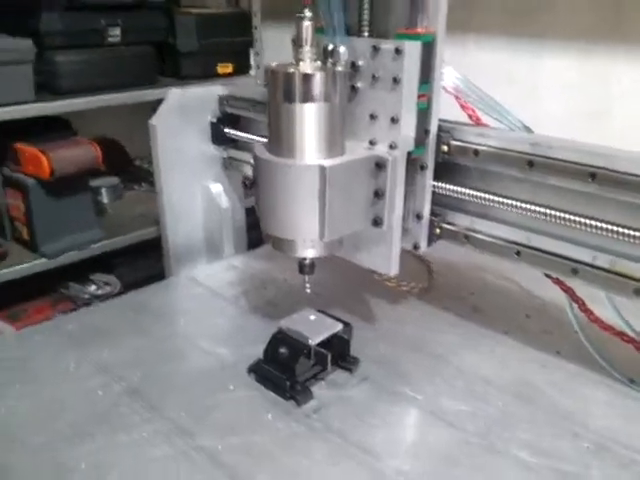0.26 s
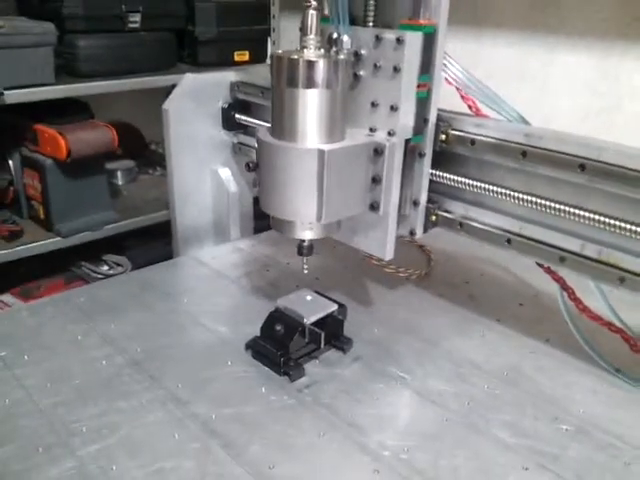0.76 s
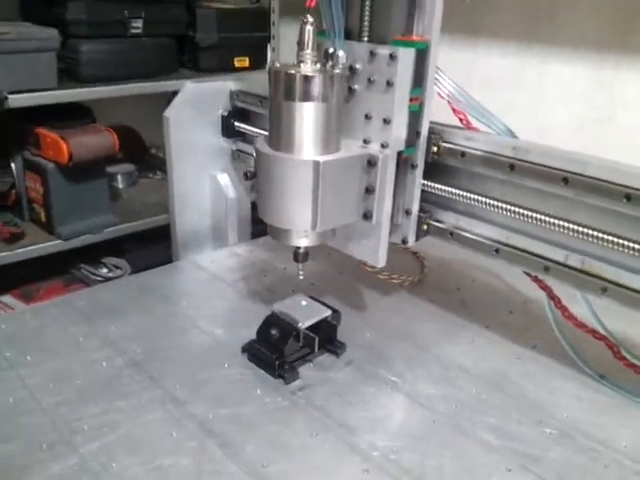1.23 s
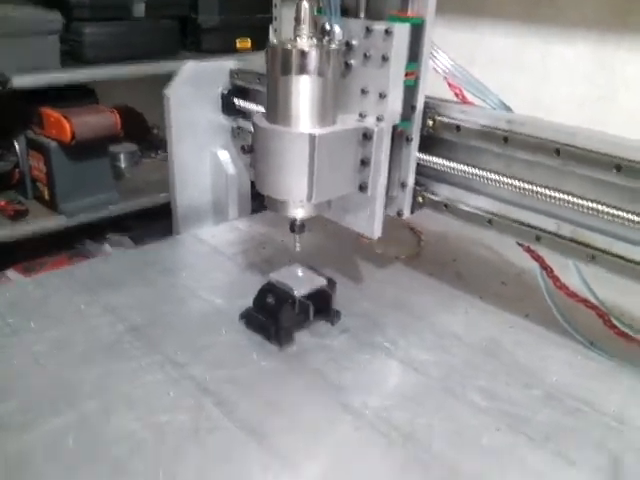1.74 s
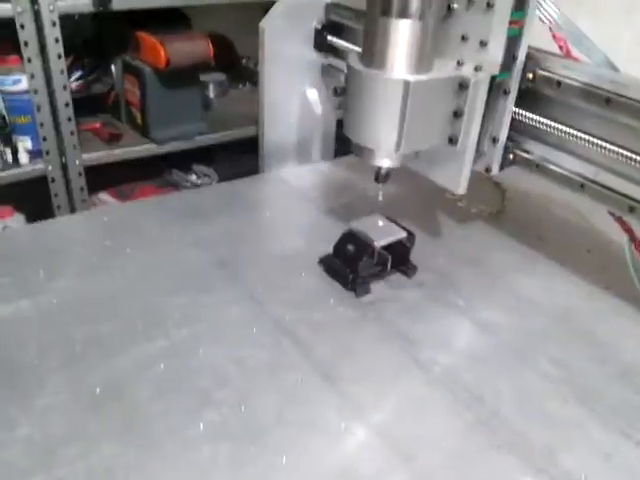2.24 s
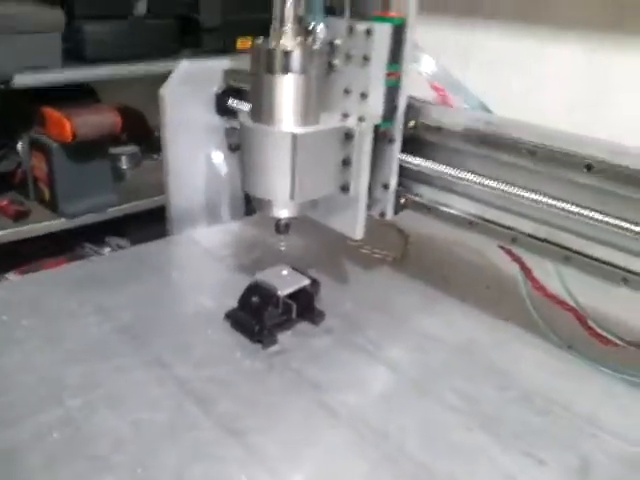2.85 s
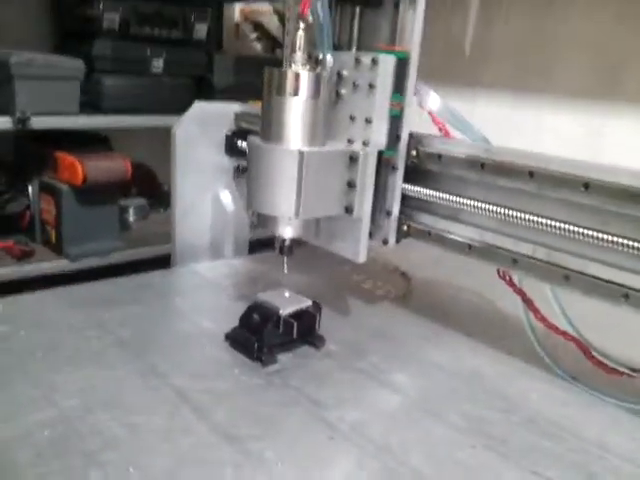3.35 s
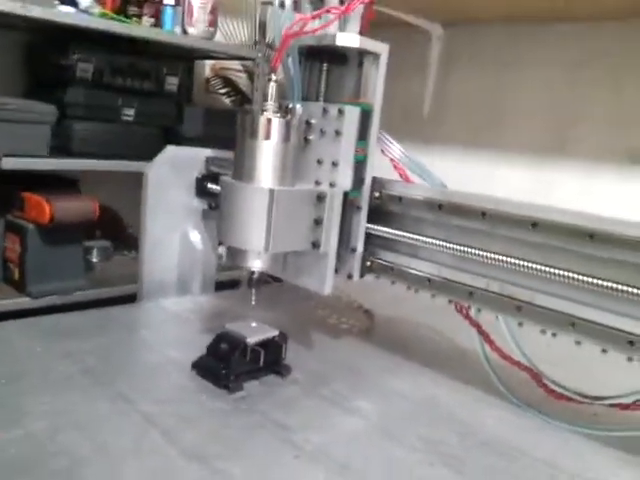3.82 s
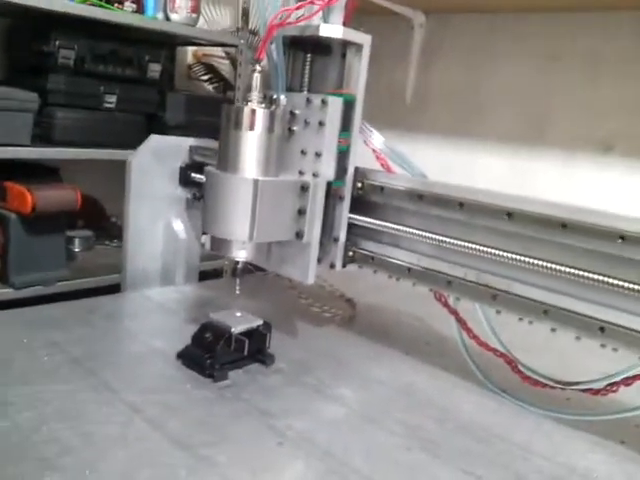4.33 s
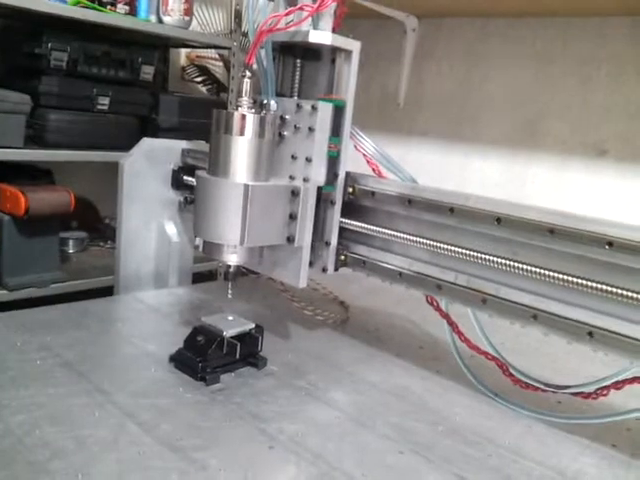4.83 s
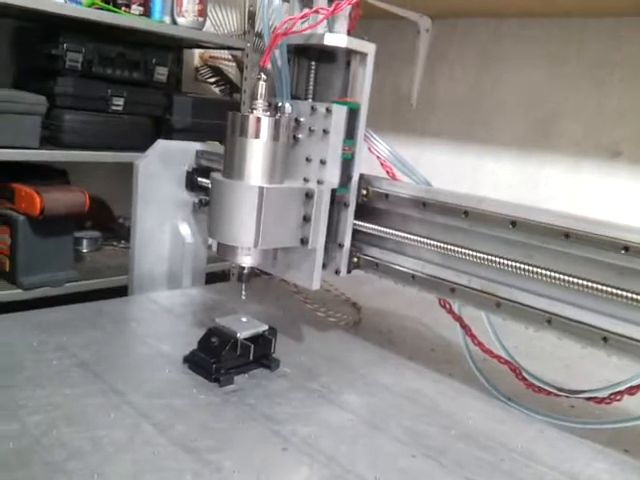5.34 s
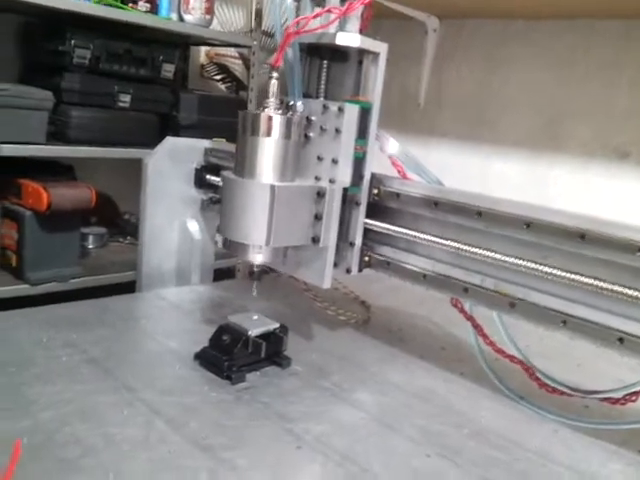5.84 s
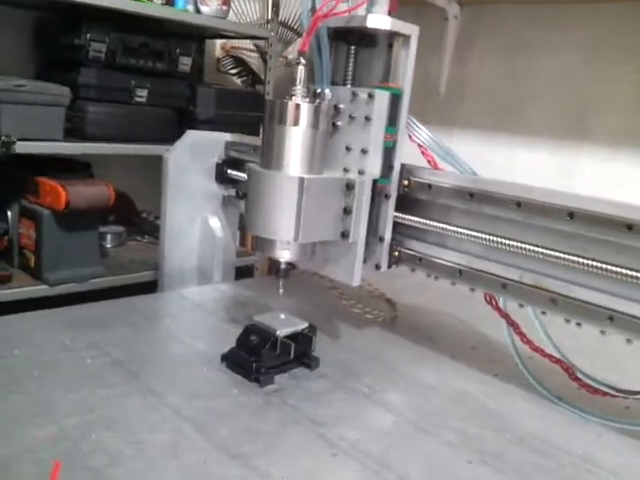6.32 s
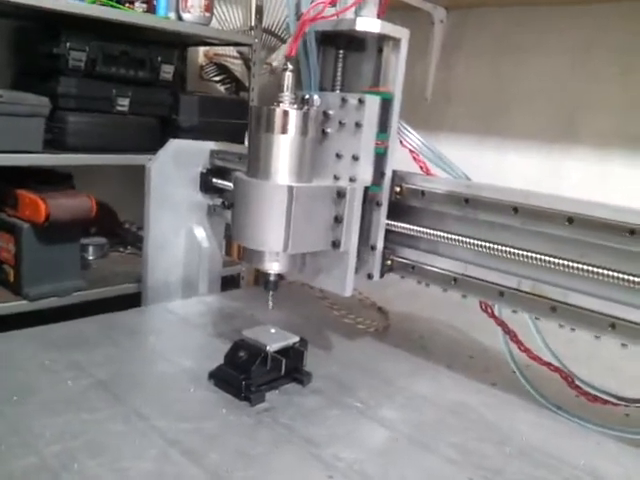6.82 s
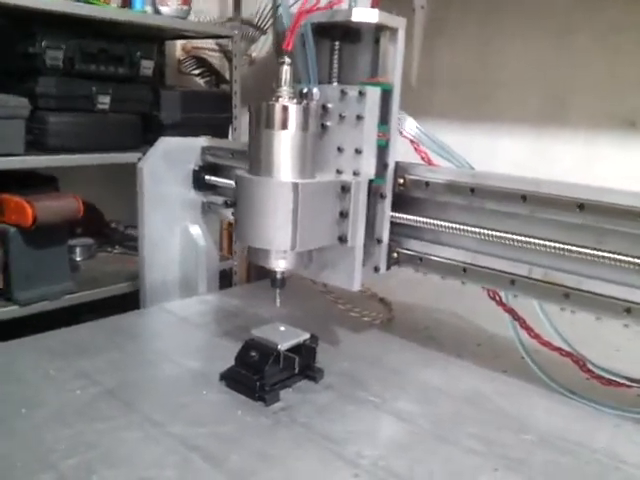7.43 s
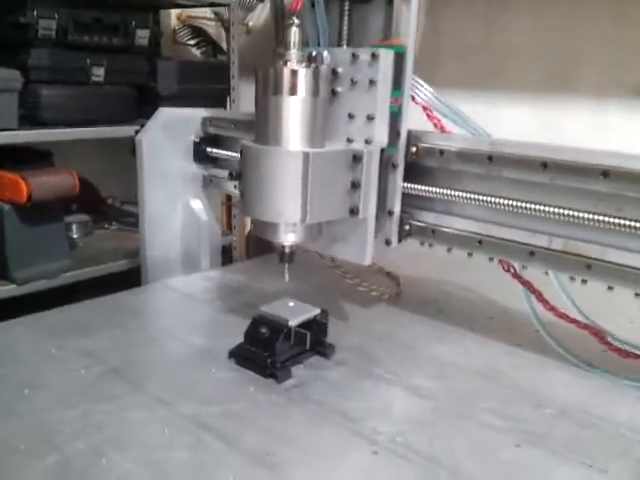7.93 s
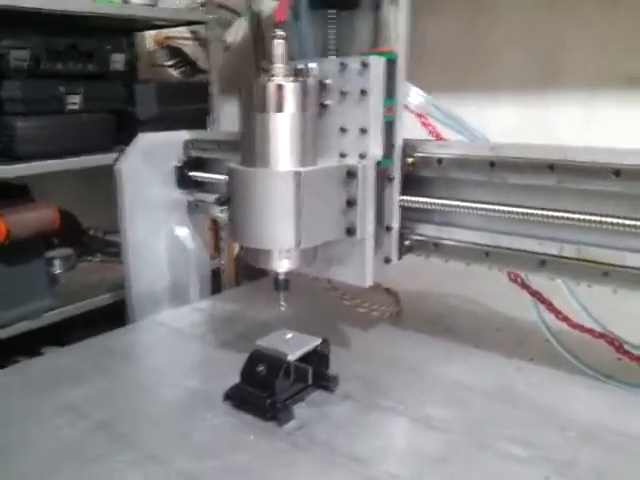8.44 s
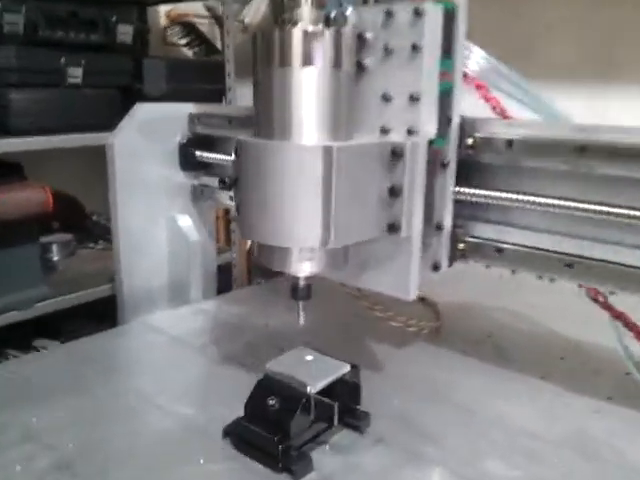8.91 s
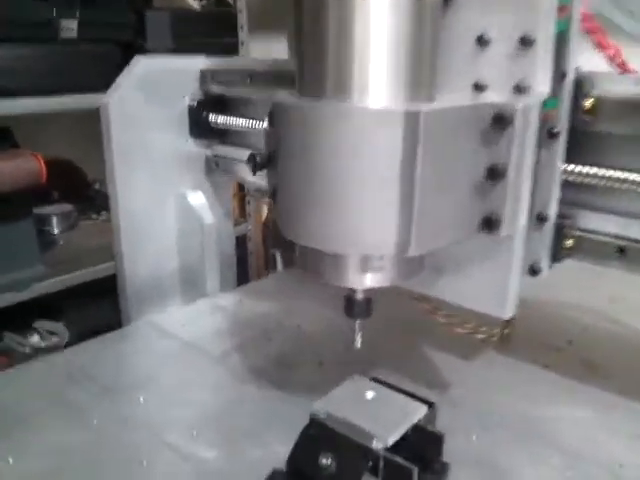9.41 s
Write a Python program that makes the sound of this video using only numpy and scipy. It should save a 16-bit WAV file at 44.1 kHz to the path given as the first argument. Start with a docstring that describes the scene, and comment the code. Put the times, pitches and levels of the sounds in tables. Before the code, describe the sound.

A pump hums and buzzes steadily in a workshop, with machine noise and a soft air hiss. A little past halfway, a CNC router spindle switches on with a crackle and a brief high whistle, which gives way to a loud, piercing electrical whine. The whine flutters ever faster as the spindle speeds up, and the bearings begin to sing. A hand-held mono microphone moves in close near the end.

```python
"""CNC router spinning up in a workshop.

A pump hums and air hisses throughout, heard through a hand-held mono microphone that moves in on the
spindle. The inverter switches on with a crackle and the windings whine at its switching rate. As the
spindle runs up, the sidebands spread and beat ever faster, and the bearings begin to sing."""
import sys
import numpy as np
from scipy import signal
from scipy.fft import rfft, irfft, next_fast_len
from scipy.io import wavfile
from scipy.ndimage import uniform_filter1d, map_coordinates

SR = 44100
rng = np.random.default_rng(int(sys.argv[2]) if len(sys.argv) > 2 else 0)


def file_out(sig):
    """Save sig as 16-bit WAV at sys.argv[1]."""
    # one column per channel
    cols = np.atleast_2d(sig).T
    # limit, then scale
    lim = np.clip(cols, -1, 1)
    pcm = np.round(lim * 32767).astype(np.int16)
    wavfile.write(sys.argv[1], SR, pcm)


N = 426447
T = np.arange(N) / SR
PUMP_HZ, CARRIER_HZ = 34.665, 3998.19
POWER_ON_S, RATE_DROP_S = 5.55, 5.92  # inverter starts; its switching rate drops
FACE_S, AWAY_S = 2.036, 8.225  # microphone swings towards the machine, then away

# Machine noise spectrum. Each row: frequency in Hz, relative density in dB.
MACHINE_SPECTRUM = [(20, -36), (55, -28), (90, -7.5), (135, 0.5), (210, 3), (280, 4), (400, 6.5),
                    (490, 4.5), (700, 4), (1000, 0), (1500, -1.5), (1950, -1.5), (2300, -6.5), (3600, -9.5),
                    (5200, -15), (9000, -15.5)]
# Air hiss spectrum. Each row: frequency in Hz, relative density in dB.
HISS_SPECTRUM = [(900, -22), (2400, -6), (3400, -7), (4500, -6), (5800, -4.5), (6700, -0.5), (8000, 0),
                 (9000, -7.5), (10200, -20), (12000, -22)]
# Sizzle spectrum. Each row: frequency in Hz, relative density in dB.
SIZZLE_SPECTRUM = [(7000, -40), (9500, -7.5), (10600, -6.5), (11400, 3.5), (12000, -8)]
# Sizzle envelope. Each row: time in seconds, level in dB before trim.
SIZZLE_ENVELOPE = [(.3, -41), (1.95, -42), (2.2, -38), (2.65, -40.5), (2.88, -37.5), (3.2, -40), (5.2, -46),
                   (6.8, -45), (7.45, -39.5), (8.15, -45), (8.4, -39), (8.8, -44.5)]
# Microphone path. Each row: time in seconds, closeness to the spindle from 0 to 1.
MIC_CLOSENESS = [(0, 0.17), (3, 0.08), (4.3, 0.03), (6.3, 0.11), (7.6, 0.36), (8.3, 0.36), (9.1, 1)]
# Pump envelopes. Each row: time in seconds, then low hum, upper hum and casing tone in dB before trim.
PUMP_ENVELOPES = [(0.3, -31.5, -36.5, -43), (1.76, -30, -32.5, -44), (2.59, -30, -35, -43.5),
                  (3.51, -30.5, -32.5, -50), (5.07, -30.5, -31.5, -45), (6.67, -31, -31.5, -49),
                  (9.67, -33.5, -35, -48)]
# Pump hum across the table. Each row: harmonic number, relative level in dB.
HARMONICS_FAR = [(1, -36), (2, -34.5), (3, -29.5), (4, -16), (5, -11.5), (6, -49), (7, -3), (8, -14.5),
                 (9, 3), (10, -27), (11, -6.5), (12, -13), (13, -24), (14, -19.5), (15, -22), (16, -9.5),
                 (17, -6), (18, -1), (19, -32), (20, -8.5), (21, -11), (22, -18.5), (23, -16.5), (24, -13),
                 (25, -18.5), (26, -25), (27, -22), (28, -24), (29, -18.5), (30, -27)]
# Pump hum by the spindle. Each row: harmonic number, relative level in dB.
HARMONICS_NEAR = [(1, -31), (2, -26), (3, -17.5), (4, -12.5), (5, -7), (6, -15), (7, -10), (8, -6.5),
                  (9, -11), (10, -7), (11, 1.5), (12, -10), (13, -16), (14, -20), (15, -21), (16, -6.5),
                  (17, -9), (18, -8), (19, -7), (20, -11.5), (21, -3), (22, -10), (23, -5), (24, -11),
                  (25, -26), (26, -18), (27, -29), (28, -21), (29, -16), (30, -17)]
# Pump casing resonances. Each row: frequency in Hz, width in Hz, gain in dB.
CASING_MODES = [(1151, 72, 3.5), (1360, 115, -4.5), (1833, 270, -3.5), (1979, 59, 3), (3018, 200, -4),
                (3320, 360, -2.5), (4400, 290, -4)]
# Ticks and crackles. Each row: peak time in seconds, level in dB, centre in Hz, width in octaves,
# 40 dB decay time in seconds.
TICK_BURSTS = [(2.049, -26, 1190, 0.39, 0.028), (3.308, -32, 5000, .3, .12), (5.558, -25, 7800, 0.24, 0.14),
               (5.928, -32, 5400, 0.035, .25), (6.685, -26.5, 5000, 0.8, .15), (8.18, -29, 2500, .4, .03)]
# Bearing envelope. Each row: time in seconds, level in dB.
BEARING_ENVELOPE = [(5.9, -70), (7, -46), (8.4, -44), (8.8, -38), (9.1, -37.5), (9.3, -35), (9.67, -37)]
# Spindle mount resonances. Each row: frequency in Hz, width in Hz, gain in dB.
MOUNT_MODES = [(394, 27, -4), (770, 55, -14), (1280, 52, -1.5), (2561, 65, 3), (4790, 250, -6.5)]
# Shaft tones. Each row: multiple of the drive frequency, relative level in dB.
SHAFT_ORDERS = [(6, -2.5), (8, -9), (9, -2), (18, -3), (31, -18)]
# Starting whistle envelope. Each row: time in seconds, level in dB.
WHISTLE_ENVELOPE = [(5.56, -47), (5.66, -32.5), (5.725, -34), (5.74, -22), (5.89, -24), (5.92, -19.5)]
# Sidebands of the starting whistle, the carrier and its octave.
# Each row: offset in multiples of the drive frequency, relative level in dB.
WHISTLE_SIDEBANDS = [(-1, 0), (0, -20), (1, -4)]
CARRIER_SIDEBANDS = [(-5.5, -13), (-4.5, -18), (-3.5, -19), (-2.5, -8), (-1.5, -7), (-.5, 0), (.5, -3),
                     (1, -9), (1.5, -6), (2, -12), (2.5, -3), (3.5, -17), (4.5, -17), (5, -16), (5.5, -14)]
OCTAVE_SIDEBANDS = [(-7, -29), (-5, -30), (-4, -18), (-2, -19), (-1, 0), (1, 0), (2, -9), (4, -19),
                    (5, -29)]


def amp(db):
    """Decibels to gain."""
    return 10 ** (np.asarray(db) / 20)


def unit(x):
    """Scale to rms 1."""
    return x / np.sqrt(np.mean(x ** 2) + 1e-20)


def steady(x):
    """Scale to rms 1 over a sliding half second."""
    return x / np.sqrt(np.abs(uniform_filter1d(x ** 2, SR // 2)) + 1e-20)


def curves(rows):
    """One per-sample curve for each column after the time."""
    times_s, *columns = np.transpose(rows)
    return [np.interp(T, times_s, column) for column in columns]


def wobble(rate_hz):
    """Smooth random curve, rms near 1."""
    knots = rng.standard_normal(int(N * rate_hz / SR) + 4)
    return np.interp(T, T[::100], map_coordinates(knots, [T[::100] * rate_hz]))


def tone(cycles):
    """Sine on a running cycle count, random starting phase."""
    return np.cos(2 * np.pi * (cycles + rng.random()))


def filtered(x, response):
    """Apply a frequency response, given as a function of Hz."""
    size = next_fast_len(N + SR // 2)
    return irfft(rfft(x, size) * response(np.fft.rfftfreq(size, 1 / SR)), size)[:N]


def noise(spectrum):
    """Noise of rms 1, coloured by (Hz, dB) points."""
    points_hz, db = np.transpose(spectrum)
    white = rng.standard_normal(N)
    return unit(filtered(white, lambda hz: amp(np.interp(np.log(hz + 1), np.log(points_hz), db))))


def resonate(x, modes):
    """Ring steep-sided modes with x; rms 1."""
    def response(hz):
        return sum(amp(db) * (1j * hz * width_hz / (mode_hz ** 2 - hz ** 2 + 1j * hz * width_hz)) ** 2
                   for mode_hz, width_hz, db in modes)
    return unit(filtered(x, response))


def swing(centre_s, length_s=0.072):
    """Progress of a microphone swing, 0 to 1."""
    return np.clip((T - centre_s) / length_s + .5, 0, 1)


def workshop(x, t60_s=0.2):
    """Short, diffuse wall reflections."""
    t = T[:SR // 2]
    tail = rng.standard_normal(len(t)) * amp(-60 * t / t60_s) * (t > .006)
    return signal.fftconvolve(x, tail / np.linalg.norm(tail))[:N]


def rumble(level_db=-66, away_db=8, drift_db=5):
    """Faint, drifting rumble; louder after the swing away."""
    gain = amp(level_db + away_db * swing(AWAY_S) + drift_db * wobble(3.3))
    return gain * noise([(20, -4), (100, -2), (250, -26), (1000, -90)])


def sizzle(trim_db=2):
    """Fine sizzle in the top treble."""
    return amp(curves(SIZZLE_ENVELOPE)[0] + trim_db) * noise(SIZZLE_SPECTRUM)


def air_hiss(level_db=-33, rise_db_per_s=.5):
    """Air hiss builds slowly; quieter off axis."""
    off_axis_db = -6.5 * (1 - swing(FACE_S)) - 6 * swing(AWAY_S)
    return amp(level_db + rise_db_per_s * T + off_axis_db) * noise(HISS_SPECTRUM)


def machine_noise(level_db=-32, fall_db_per_s=0.23):
    """Broad noise, throbbing four times per pump stroke."""
    throb = 1 + 0.15 * np.cos(2 * np.pi * 4 * PUMP_HZ * T)
    return amp(level_db - fall_db_per_s * T) * throb * noise(MACHINE_SPECTRUM)


def pump(drift_db=1, jitter_cycles=0.0045):
    """Stroke harmonics and casing buzz; the balance shifts as the microphone crosses standing waves."""
    low_db, upper_db, casing_db = curves(PUMP_ENVELOPES)
    near = curves(MIC_CLOSENESS)[0]
    strokes = PUMP_HZ * T + jitter_cycles * wobble(5)
    harmonics = []
    for (k, far_db), (_, near_db) in zip(HARMONICS_FAR, HARMONICS_NEAR):
        gain = amp(far_db + near * (near_db - far_db) + drift_db * wobble(1.35))
        lag_cycles = k * k / 16 + .005 * k * wobble(.6)  # smears each stroke into an even hum
        harmonics.append(gain * np.cos(2 * np.pi * (k * strokes - lag_cycles)))
    low_hum = amp(low_db - 1.07) * steady(sum(harmonics[:13]))
    upper_hum = amp(upper_db - 0.7) * steady(sum(harmonics[13:23] + harmonics[24:]))
    casing_tone = amp(casing_db + 2) * steady(harmonics[23])
    # the same rattle on every stroke
    rattle = np.interp(strokes, np.arange(512) / 512, rng.standard_normal(512), period=1)
    buzz = amp(low_db - 11 - 3 * near) * resonate(rattle, CASING_MODES)
    return low_hum + upper_hum + casing_tone + buzz


def ticks(rise_share=0.33):
    """Band-limited noise bursts that rise faster than they die."""
    out = np.zeros(N)
    for peak_s, db, centre_hz, width_oct, decay_s in TICK_BURSTS:
        white = rng.standard_normal(N)
        band = filtered(white, lambda hz: np.exp(-.5 * (np.log2((hz + 1) / centre_hz) / width_oct) ** 2))
        slope_s = np.where(T < peak_s, rise_share * decay_s, decay_s)
        out += amp(db - 40 * np.abs(T - peak_s) / slope_s) * unit(band)
    return out


def bearings(cycles, flutter_db=2, shaft_db=-3, comb_db=-9):
    """Rolling balls ring the spindle mount; thin tones climb with the shaft."""
    song = resonate(rng.standard_normal(N), MOUNT_MODES)
    unsteady_cycles = cycles + 0.0028 * wobble(12)
    shaft = unit(sum(amp(db + 1.8 * wobble(2.2)) * tone(k * unsteady_cycles) for k, db in SHAFT_ORDERS))
    comb = unit(sum(amp(4 * wobble(2.4)) * tone(k * cycles) for k in range(126, 150, 3)))
    gain = (T > POWER_ON_S) * amp(curves(BEARING_ENVELOPE)[0] + flutter_db * wobble(15))
    return gain * (song + amp(shaft_db) * shaft + amp(comb_db) * comb)


def run_up(turn_s=5.688, creep_hz=5.8, full_hz=47.822, origin_s=5.5435, tau_s=2.6512):
    """Drive frequency in Hz: the field creeps, then climbs and levels off towards full speed."""
    return (T > turn_s) * np.maximum(creep_hz, full_hz * np.tanh((T - origin_s) / tau_s))


def sidebands(centre_hz, bands, cycles, upper_db, scatter_rad, flutter_db, lag_rad):
    """Lines round a switching tone, power 1; weak ones come late off the walls, at wandering phases."""
    sound, power = 0, 0
    for offset, db in bands:
        gain = amp(db + upper_db * (offset > 0) + flutter_db * wobble(11))
        weakness = 1 - min(amp(db), 1)
        wander_rad = weakness * (scatter_rad * wobble(2.5) - lag_rad)
        sound += gain * np.cos(2 * np.pi * (centre_hz * T + offset * cycles) + wander_rad)
        power += gain ** 2 / 2
    return sound / np.sqrt(power)


def starting_whistle(cycles, overtone_db=-14):
    """Windings sing a fourth above the running switching rate."""
    start_hz = CARRIER_HZ * 4 / 3
    first, second = (sidebands(hz, WHISTLE_SIDEBANDS, cycles, upper_db=1, scatter_rad=.3,
                               flutter_db=.3, lag_rad=0) for hz in (start_hz, 2 * start_hz))
    return amp(curves(WHISTLE_ENVELOPE)[0]) * (first + amp(overtone_db) * second)


def running_whine(drive_hz, cycles, knee_hz=29):
    """Windings sing at the switching rate and its octave, swelling up to a knee speed, then easing."""
    away, near = swing(AWAY_S), curves(MIC_CLOSENESS)[0]
    below_hz, above_hz = np.maximum(knee_hz - drive_hz, 0), np.maximum(drive_hz - knee_hz, 0)
    carrier_db = -25 - .4 * below_hz - .25 * above_hz - 3.5 * away
    octave_db = -12.7 - .25 * below_hz - .25 * above_hz - 8 * away
    unrest = 1 + 2.3 * near  # more flutter by the spindle
    # each tone pulses at its own point in the drive cycle
    carrier = sidebands(CARRIER_HZ, CARRIER_SIDEBANDS, cycles - .4, upper_db=.3,
                        scatter_rad=1.1 * unrest, flutter_db=1.1 * unrest, lag_rad=1.4)
    octave = sidebands(2 * CARRIER_HZ, OCTAVE_SIDEBANDS, cycles - .5, upper_db=-7 * (1 - near ** 2),
                       scatter_rad=.45 * unrest, flutter_db=.91 * unrest, lag_rad=2)
    carrier_tremble_db = 1.4 * wobble(110)
    octave_tremble_db = .25 * unrest * wobble(46)
    return amp(carrier_db + carrier_tremble_db) * carrier + amp(octave_db + octave_tremble_db) * octave


def inverter(drive_hz, cycles, crossfade_s=.012):
    """The switching rate starts high, then drops: whistle gives way to whine."""
    running = np.clip((T - RATE_DROP_S) / crossfade_s, 0, 1)
    starting = (T > POWER_ON_S) * (1 - running)
    return starting * starting_whistle(cycles) + running * running_whine(drive_hz, cycles)


def scene(room_db=-15):
    """Mono mix on two channels; the drive cycles pace both whine and bearings."""
    drive_hz = run_up()
    cycles = np.cumsum(drive_hz) / SR
    whine = inverter(drive_hz, cycles)
    background = pump() + air_hiss() + machine_noise() + sizzle() + rumble()
    mono = background + whine + amp(room_db) * workshop(whine) + bearings(cycles) + ticks()
    return np.array([mono, mono])


def record(dry, fade_s=0.27, fade_from_db=-22.5, top_hz=11850):
    """Fade-in and brick-wall low-pass."""
    fade = np.minimum(amp(fade_from_db) + T / fade_s, 1)
    return np.array([filtered(fade * channel, lambda hz: hz < top_hz) for channel in dry])


dry = scene()
out = record(dry)
file_out(out)
```